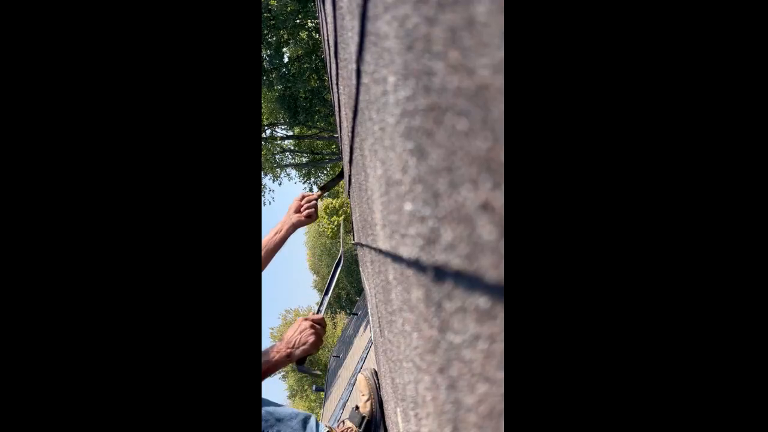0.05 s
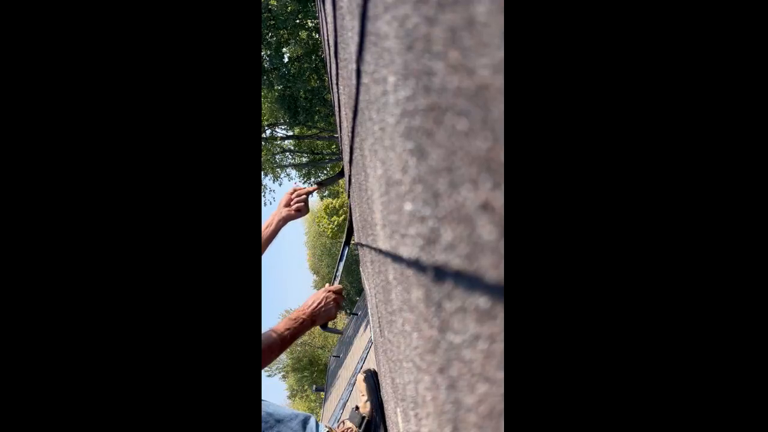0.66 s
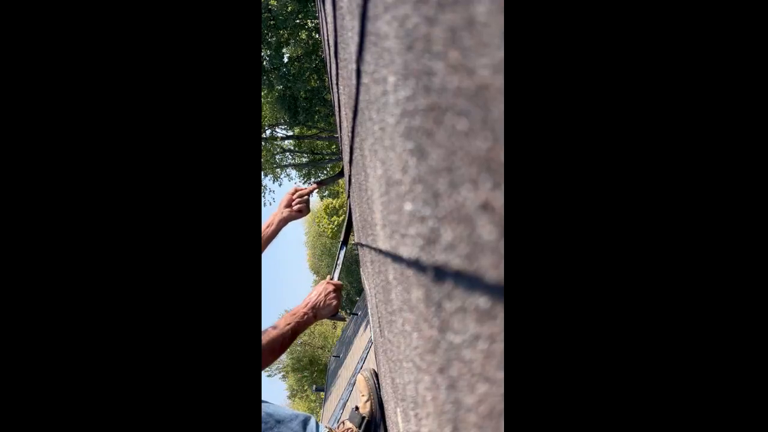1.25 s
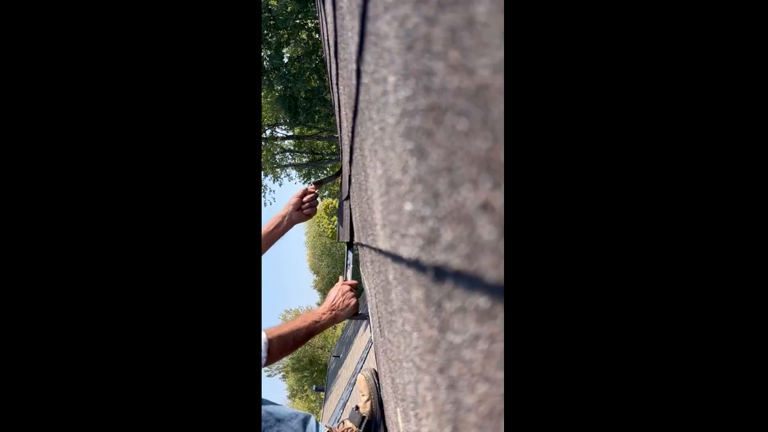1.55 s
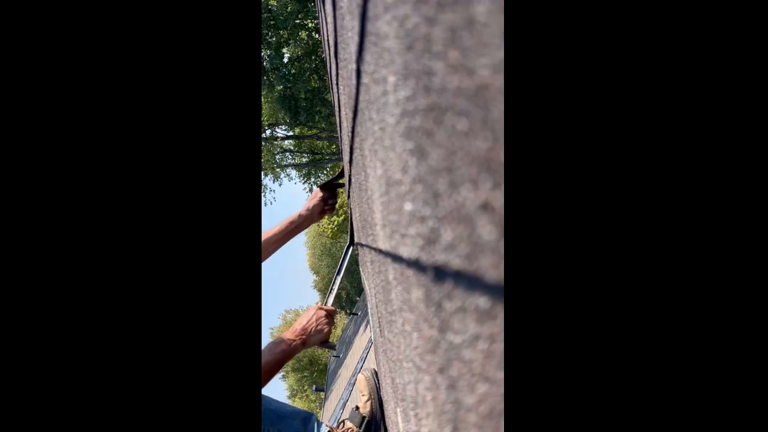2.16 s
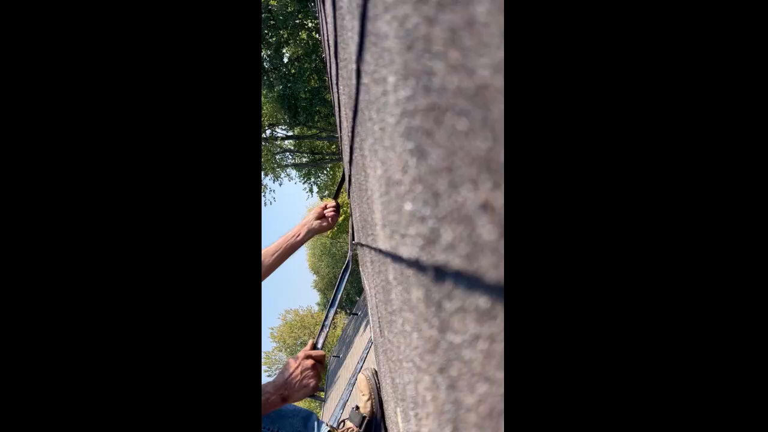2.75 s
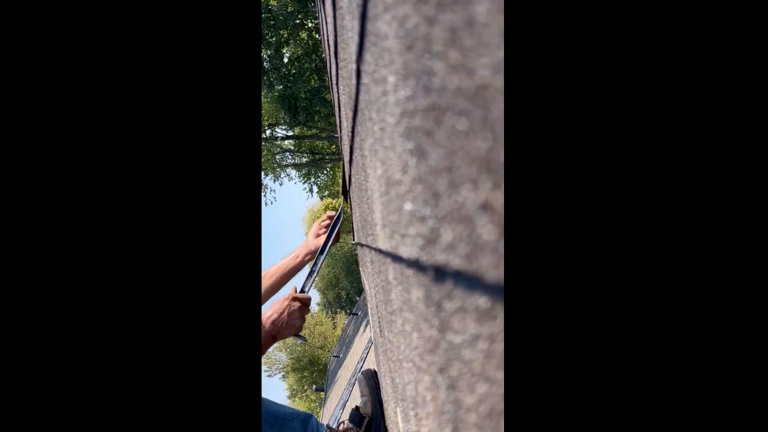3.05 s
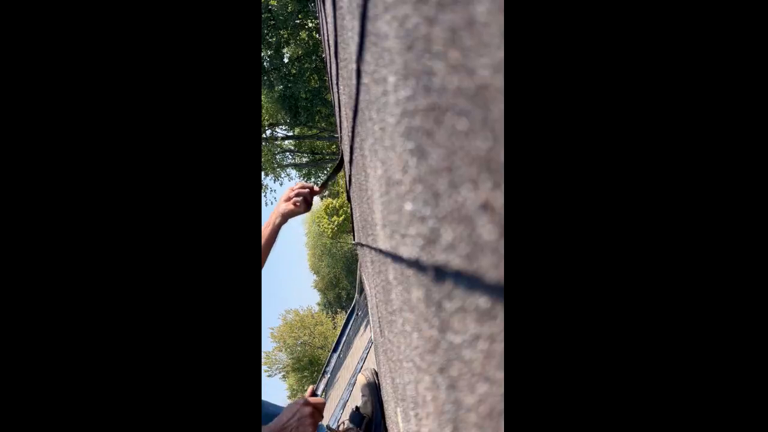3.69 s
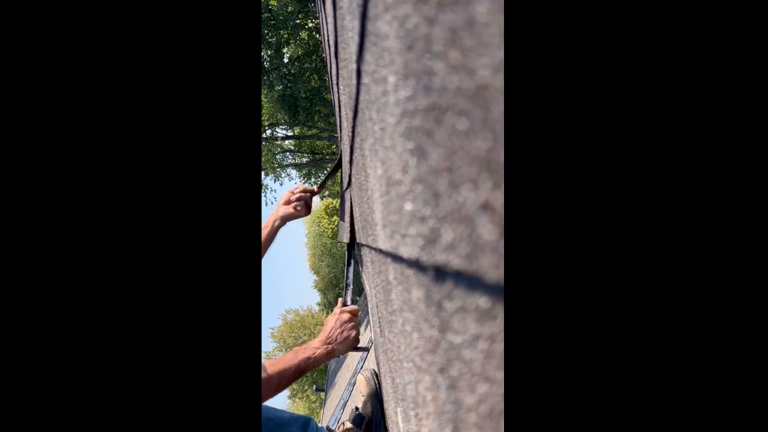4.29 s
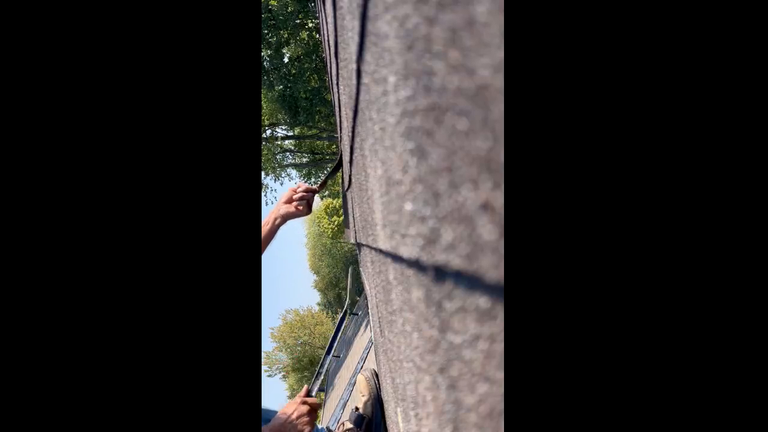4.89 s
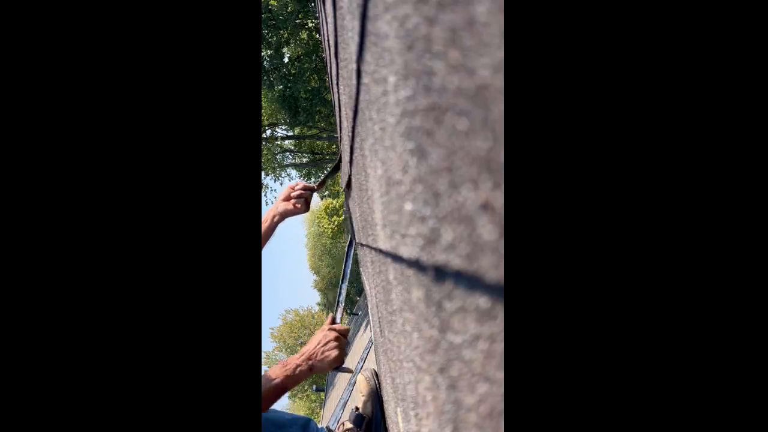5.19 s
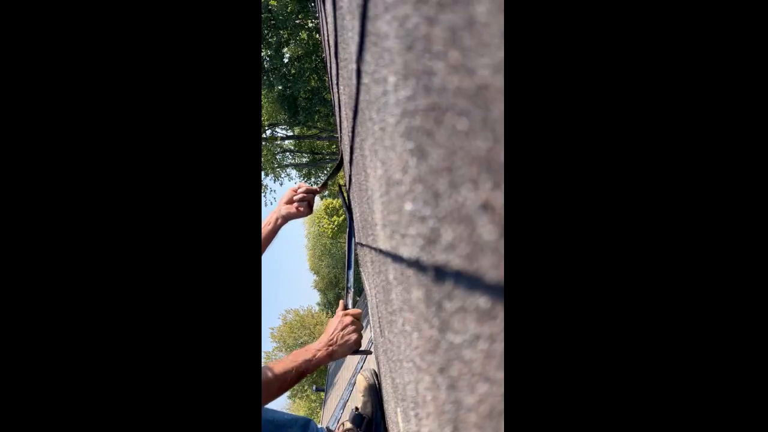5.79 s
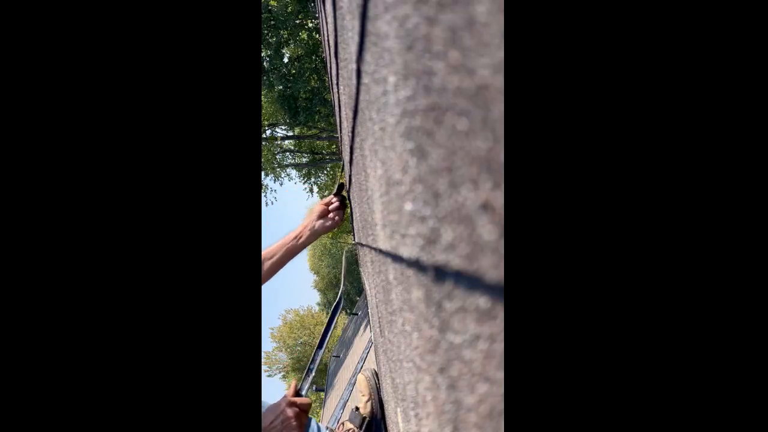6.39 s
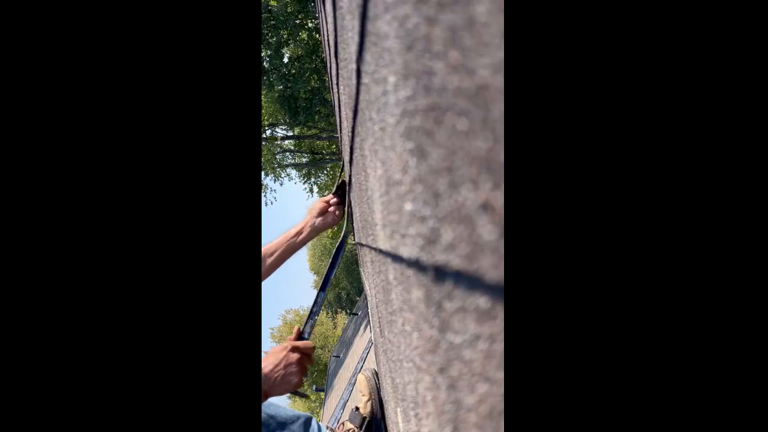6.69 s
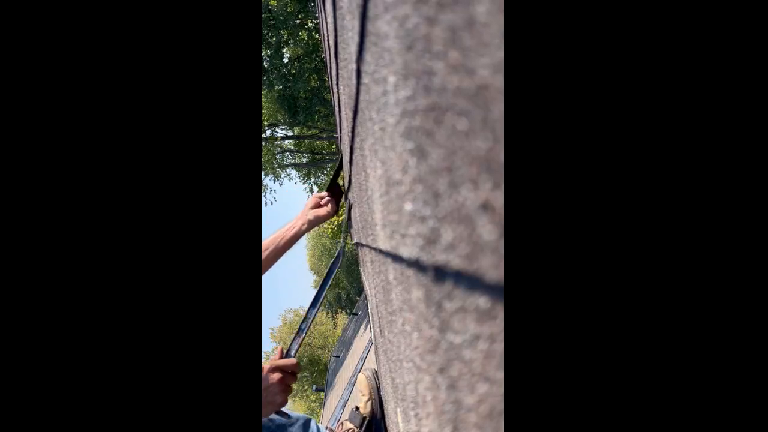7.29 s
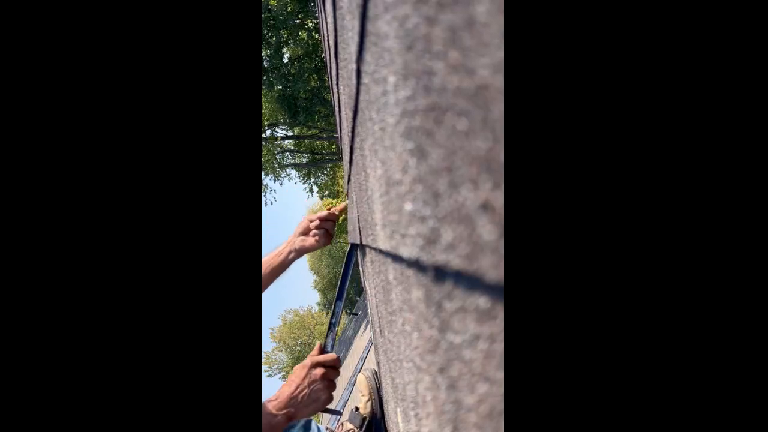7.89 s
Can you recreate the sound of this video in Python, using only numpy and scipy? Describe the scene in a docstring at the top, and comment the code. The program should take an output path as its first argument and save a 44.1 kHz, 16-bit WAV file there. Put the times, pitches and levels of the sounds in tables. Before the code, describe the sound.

Close, uneven scraping and snapping as roof shingles are pried loose with a metal bar, over faint wind and a distant vehicle.

```python
"""On a roof, close to a microphone lying there, a steel pry bar is worked under asphalt shingles.
Friction fractures the grit and faintly excites the modes of the bar; tar seams crack and tear.
The wooden deck carries each blow as a bending wave (a thump) and creaks by stick-slip under the lever.
Light wind rumbles, and the tyres and engine of a vehicle pass far off."""
import sys
import numpy as np
from scipy import signal
from scipy.fft import rfft, irfft
from scipy.io import wavfile

SR = 44100
rng = np.random.default_rng(int(sys.argv[2]) if len(sys.argv) > 2 else 0)


def transcribe(u):
    """Save the signal u as a 16-bit wav file named by the first command-line argument.

    u: samples, shape (n,) or (channels, n), limited to [-1, 1]; the rate is SR.
    q: integer samples, one column per channel.
    """
    v = np.clip(np.atleast_2d(u).T, -1, 1)
    q = np.round(v * 32767).astype(np.int16)
    wavfile.write(sys.argv[1], SR, q)


N = 355005
TIME, FREQS = np.arange(N) / SR, np.fft.rfftfreq(N, 1 / SR)

# Table levels are relative; "pressure" sets the lower, rougher part of a sound against its bright part.
# a seam gives way, the deck springs back: (time [s], snap [dB], pressure [dB], thump [dB], pitch [Hz])
RELEASES = [(0.237, -21.5, -2.5, -19, 145), (1.107, -19.5, 0, -11, 132), (1.373, -21.5, -1, -19.5, 145),
            (3.571, -27.5, -0.5, -27, 157), (3.871, -20, -6, -18.5, 186), (4.489, -18, -3, -14, 188),
            (5.186, -5.5, -3.5, -4.5, 181), (5.715, -17.5, 1, -15, 96), (7.446, -34, -1, -24, 134)]
# modes of the steel bar: (frequency [Hz], level [dB], t60 [s])
BAR_MODES = [(2035, -2, .06), (2680, -7, .04), (3042, 1, .15), (3553, -7, .06), (4075, -2, .065),
             (4673, -1.5, .11), (5243, -4, .07), (6000, -9, .06), (6700, -13, .1), (7120, -11, .1),
             (7325, -6.5, .08), (7900, -9, .1), (8177, -11, .08), (9000, -13, .04), (9700, -7.5, .06),
             (10780, -9.5, .06), (11680, -11, .07), (12500, -14, .05), (13430, -15, .05), (14000, -14, .04)]


def amp(db):
    """Amplitude ratio for a level in decibels."""
    return np.exp(np.asarray(db) * (np.log(10) / 20))


def unit(x):
    """Normalisation to an rms of one."""
    return x / np.sqrt(np.mean(x ** 2) + 1e-20)


def read(points, hz):
    """Interpolation on a log-frequency axis."""
    f, value = np.transpose(points)
    return np.interp(np.log(hz + 1), np.log(f + 1), value)


def curve(points):
    """Linear interpolation in time, sample by sample."""
    return np.interp(TIME, *np.transpose(points))


def add(mix, s, sound):
    """Superposition: a sound joins the mix at s seconds."""
    part = mix[max(round(s * SR), 0):][:len(sound)]
    part += sound[:len(part)]


def colour(x, spectrum, size=2048):
    """Minimum-phase filter of unit energy with the given spectral shape."""
    log_gain = np.log(amp(read(spectrum, abs(np.fft.fftfreq(size, 1 / SR)))))
    response = np.exp(np.conj(signal.hilbert(log_gain)))
    taps = np.fft.ifft(response).real[:size // 2]
    return signal.oaconvolve(x, taps / np.linalg.norm(taps))[:N]


def resonate(x, hz, width_hz):
    """Damped resonator of unit energy whose frequency follows the curve hz."""
    turn = np.exp(2j * np.pi * np.cumsum(hz) / SR)
    r = np.exp(-np.pi * width_hz / SR)
    return (turn * signal.lfilter([np.sqrt(2 * (1 - r * r))], [1, -r], x / turn)).real


def wander(rate, size=8192):
    """Low-pass noise of unit rms that changes about rate times a second."""
    f = np.fft.rfftfreq(size, N / SR / size)
    slow = unit(irfft(rfft(rng.standard_normal(size)) * np.exp(-(f / rate) ** 2)))
    return np.interp(TIME, np.linspace(0, N / SR, size), slow)


def swell(s, half_width_s, db):
    """Gaussian envelope around one moment."""
    return amp(db) * np.exp(-np.minimum(((TIME - s) / half_width_s) ** 2, 20))


def contact(attack_s, hold_s, release_s):
    """Envelope with a linear attack and, after hold_s, exponential decay."""
    t = TIME[:SR]
    return np.minimum(t / attack_s, 1) * np.exp(-np.clip((t - hold_s) / release_s, 0, 20))


def stereo_noise(spectrum, apart=0.25):
    """Partial coherence: both microphone ports share one noise and differ by a weaker one."""
    shared, side = [colour(noise, spectrum) for noise in rng.standard_normal((2, N))]
    return shared + apart * np.outer([1, -1], side) / np.sqrt(2)


def wind(calm_db=-45, hiss_db=-66):
    """Amplitude-modulated noise: gusts swell an uneven low rumble over a faint, steady hiss."""
    # gusts: (time [s], half width [s], level [dB])
    gusts = [(1.5, 0.78, -58), (4.25, 0.52, -36.5), (5.55, 0.34, -42), (6.85, 0.41, -39),
             (7.699, 0.24, -41.5)]
    # spectra of the rumble and the hiss: (frequency [Hz], level [dB])
    rumble_spectrum = [(20, -41), (40, -8.5), (60, 7.5), (110, 1.5), (170, -1.5), (260, -11), (400, -23),
                       (1000, -57), (4000, -56)]
    hiss_spectrum = [(100, -68), (2000, -6), (4000, -7.5), (7000, -12), (9000, -16), (15000, -35)]
    strength = amp(calm_db) + sum(swell(*gust) for gust in gusts)
    buffeting = unit(amp(3 * wander(16)))
    rumble = stereo_noise(rumble_spectrum) * strength * buffeting
    return rumble + amp(hiss_db) * stereo_noise(hiss_spectrum)


def vehicle(nearest_s=3.99, pass_width_s=1.2, tyre_db=-44.5):
    """Spherical spreading: tyre noise falls as 1 / distance; the engine sounds firing-rate harmonics."""
    # tyre noise: (frequency [Hz], level [dB])
    tyre_spectrum = [(40, -28), (200, 3.5), (400, 1), (700, -4.5), (1200, -10), (2000, -14.5), (3000, -20),
                     (5000, -48), (15000, -98)]
    # the engine revs up and eases off: (time [s], firing rate [Hz])
    firing = [(2.4, 80), (3.1, 83), (3.9, 96), (4.4, 99), (5, 94), (5.7, 96), (6.2, 83), (6.7, 80)]
    distance = np.hypot(1, (TIME - nearest_s) / pass_width_s)  # one at the nearest point
    tyres = stereo_noise(tyre_spectrum) * amp(tyre_db) / distance
    phase = 2 * np.pi * np.cumsum(curve(firing) * (1 + 0.0031 * wander(13))) / SR
    whine = swell(4.7, half_width_s=0.38, db=-49.5) * np.sin(4 * phase)
    exhaust = swell(6.01, half_width_s=0.48, db=-42.5) * np.sin(phase)
    return tyres + np.sqrt(2) * (whine + exhaust) * amp(2 * wander(35))


def cracks(gain_db=2, rise_s=0.0006, abruptness=1.35):
    """Brittle fracture: noise bursts, shorter when harder; returned plain and weighted by pressure."""
    # small cracks of tar and catches of the blade: (time [s], level [dB], pressure [dB])
    small_cracks = [(.459, -40, -4), (.8127, -41.5, 0.5), (1.176, -44.5, 1.5), (1.314, -31.5, -3.5),
                    (1.337, -23, 3), (2.54, -41.5, 2.5), (2.6, -20, -5), (2.8755, -31, -11),
                    (3.22, -46.5, 2), (4.249, -40, -4), (4.275, -44, -9), (4.334, -53, 13.5),
                    (4.373, -35, -4), (4.469, -27, 2), (4.713, -36, -2), (5.1754, -8.5, -3),
                    (5.232, -38.5, -5), (5.468, -51.5, 5), (5.664, -40.5, 0.5), (5.685, -44.5, 13),
                    (6.584, -35.5, -14), (6.717, -30.5, -7), (6.833, -29.5, -5.5), (7.108, -44.5, -4),
                    (7.394, -37.5, -4.5), (7.442, -33.5, -1.5), (7.737, -29.5, -3), (7.752, -33.5, -3),
                    (7.791, -44, -3), (7.803, -28.5, -2), (7.838, -39, -1)]
    reference_s, reference_db, halving_db = 0.0044, -20.5, 18
    snaps, heavy_snaps = np.zeros((2, N))
    t = TIME[:SR // 16]
    for s, db, pressure_db, *_ in [*small_cracks, *RELEASES]:
        decay_s = reference_s * 2 ** ((reference_db - db) / halving_db)
        envelope = np.exp(-(t / decay_s) ** abruptness) * (1 - np.exp(-t / rise_s))
        burst = amp(db + gain_db) * rng.standard_normal(len(t)) * envelope
        add(snaps, s, burst)
        add(heavy_snaps, s, burst * amp(pressure_db))
    return snaps, heavy_snaps


def clinks(reach_octaves=0.56):
    """Free vibration: a tap excites the bar's modes around one frequency, and each dies away."""
    # taps on the free bar: (time [s], level [dB], centre frequency [Hz])
    taps = [(0.237, -46, 6950), (0.322, -38, 5160), (2.795, -51, 3260), (3.349, -41, 3840),
            (3.573, -36.5, 3970), (7.352, -38, 3220), (7.397, -40.5, 3200), (7.447, -37.5, 4800)]
    out, t = np.zeros(N), TIME[:SR // 6]
    for hz, db, t60 in BAR_MODES:
        mode = np.sin(2 * np.pi * hz * t) * amp(-60 * t / t60)
        for s, tap_db, tap_hz in taps:
            coupling = np.exp(-(np.log2(hz / tap_hz) / reach_octaves) ** 2)
            add(out, s, mode * amp(tap_db + db / 2) * coupling)
    return out


def bending_wave(hz, q=2.5, octaves=1.13, lag=0.0773, size=8192):
    """Dispersion: high notes cross the damped boards first, so a blow sweeps down, then rings briefly."""
    f = np.fft.rfftfreq(size, 1 / SR)
    ratio = (f + 1) / hz
    band = np.exp(-(np.log2(ratio) / octaves) ** 2 / 2)
    resonance = 1 / (1 + 1j * q * (ratio - 1 / ratio))
    dispersion = np.exp(-4j * np.pi * lag * np.sqrt(f))  # group delay = lag / sqrt(f)
    wave = irfft(band * resonance * dispersion)[:size // 2]
    return wave / abs(wave).max()


def thumps(spring_s=0.0016):
    """Impulse response of the deck: it is struck by the lever, or springs back just after a release."""
    # the lever bumps or bears down on the deck: (time [s], peak [dB], pitch [Hz])
    blows = [(.53, -30, 134), (.698, -30, 101), (1.505, -22, 80), (1.589, -26.5, 113), (1.843, -35, 144),
             (1.967, -18, 238), (2.972, -32, 98), (3.644, -25, 161), (3.772, -19.5, 176),
             (3.896, -16.5, 202), (4.169, -21.5, 470), (4.305, -24, 162), (4.482, -14.5, 242),
             (4.5, -10.5, 131), (4.82, -23, 159), (5.185, -9, 426), (5.466, -25.5, 252), (5.687, -14, 186),
             (6.412, -30, 94), (6.585, -28.5, 102), (6.751, -26.5, 115), (6.918, -29, 103),
             (7.365, -36, 99), (7.68, -29, 124), (7.73, -26.5, 130)]
    rebounds = [(s + spring_s, db, hz) for s, _, _, db, hz in RELEASES]
    out = np.zeros(N)
    for s, db, hz in [*blows, *rebounds]:
        add(out, s, amp(db) * bending_wave(hz))
    return out


def strokes(resting_db=-70, shove_swell_db=15.5, crumbs_db=-39.5, attack_s=0.0062, bite_s=0.011):
    """Envelopes of sliding friction and its rasp: drags hold, shoves swell, jabs and crumbs die away."""
    # the blade slides evenly: (time [s], length [s], level [dB], pressure [dB])
    drags = [(0.314, 0.23, -42.5, -6), (0.544, 0.13, -63, 2), (0.723, 0.19, -47.5, 2),
             (1.608, 0.39, -59, 4), (1.974, 0.021, -45.5, 5.5), (2.5, 0.18, -49, -0.5),
             (2.823, 0.12, -53.5, -2), (2.933, 0.17, -47.5, 4.5), (3.567, 0.04, -40.5, -1.5),
             (6.579, 0.29, -48, -0.5), (7.122, 0.096, -45, 2), (7.561, 0.23, -50, -1)]
    # it is forced in ever harder, then stops: (time [s], length [s], final level [dB], pressure [dB])
    shoves = [(1.015, 0.087, -33.5, 2.5), (2.097, 0.34, -51, 4.5), (3.256, 0.11, -42, 3),
              (3.679, 0.2, -37, -1), (3.805, 0.078, -33, 6.5), (4.165, 0.086, -41, 2),
              (4.6, 0.1, -52.5, -7), (5.379, 0.066, -52.5, 0), (5.944, 0.17, -55.5, 0.5),
              (7.563, 0.3, -48, 3.5)]
    # the tip bites and skids off: (time [s], level [dB], pressure [dB])
    jabs = [(2.787, -31.5, -6.5), (4.477, -27, 8.5), (5.172, -47, 24), (5.708, -38.5, 11.5),
            (5.847, -42, -1), (7.345, -37, -7)]
    moves = [(s, db, pressure_db, contact(attack_s, length, release_s=0.022))
             for s, length, db, pressure_db in drags]
    for s, length, db, pressure_db in shoves:
        effort = amp(-shove_swell_db * np.maximum(1 - TIME[:SR] / length, 0))
        moves.append((s, db, pressure_db, effort * contact(attack_s, length, release_s=0.01)))
    for s, db, pressure_db in jabs:
        moves.append((s, db, pressure_db, contact(bite_s, bite_s, release_s=0.014)))
    for s, db, pressure_db, *_ in RELEASES:  # loose grit follows each release
        moves.append((s, db + crumbs_db, pressure_db, contact(bite_s, bite_s, release_s=0.033)))
    level, rasp_level = np.full((2, N), amp(resting_db))
    for s, db, pressure_db, shape in moves:
        add(level, s, amp(db) * shape)
        add(rasp_level, s, amp(db + pressure_db) * shape)
    return level, rasp_level


def granules(per_s=10000, rub=0.66, spread_db=3.9, clump_db=2.4):
    """Shot noise: tiny fractures of uneven size come in mild clumps, over a fine rub."""
    ticks = rng.standard_normal(N) * (rng.random(N) < per_s / SR)
    ticks *= amp(spread_db * np.minimum(rng.exponential(1, N), 3))
    friction = unit(ticks) + rub * rng.standard_normal(N)
    return unit(friction * amp(clump_db * wander(110)))


def catches(level, per_s=60, gain_db=3, low_hz=1100, high_hz=5000, decay_s=0.0027):
    """Damped oscillations: coarse grains catch on the edge and let go, each ringing at its own pitch."""
    out, t = np.zeros(N), TIME[:SR // 40]
    for s, (late, pitch) in zip(np.arange(0, N / SR, 1 / per_s), rng.random((1500, 2))):
        hz = low_hz * (high_hz / low_hz) ** pitch
        add(out, s + late / per_s, np.sin(2 * np.pi * hz * t) * np.exp(-t / decay_s))
    return out * amp(gain_db) * level


def bar_ring(slide, level, ring_db=-6.5, shift_db=5, slip_limit=0.015, grip=0.002):
    """Forced vibration: the scrape drives the bar's modes, which come and go as the contact moves."""
    drive = slip_limit * np.tanh(slide / slip_limit)  # hard strokes wedge the bar: it sings no louder
    drive *= level / (level + grip)  # a light touch hardly sets it ringing
    contacts = [drive * unit(amp(shift_db * np.clip(wander(9), -1, 1))) for _ in range(5)]
    out = np.zeros(N)
    for k, (hz, db, t60) in enumerate(BAR_MODES):
        r, w = amp(-60 / t60 / SR), 2 * np.pi * hz / SR
        gain = amp(db + ring_db) * np.sqrt(2 * (1 - r * r)) * np.sin(w)
        out += signal.lfilter([gain], [1, -2 * r * np.cos(w), r * r], contacts[k % len(contacts)])
    return out


def flap(drive, roam=0.15):
    """Variable resonance: the natural frequency of the lifted shingle roams as it is bent."""
    # resonance of the shingle: (time [s], frequency [Hz])
    resonance = [(.4, 1270), (.87, 1430), (1.08, 1810), (2.54, 1380), (2.6, 1860), (3, 1300), (3.12, 1290),
                 (3.8, 1160), (3.87, 1460), (4.7, 1160), (6.8, 1330), (7.15, 1190), (7.8, 1390)]
    return resonate(drive, curve(resonance) * np.exp(roam * wander(20)), width_hz=230)


def rips(start_hz=1440, end_hz=474, width_hz=900, swell_db=12):
    """Cascading fracture: a dense crunch builds, and its resonance drops as the shingle comes free."""
    # a tar seam tears right through: (time [s], length [s], level [dB])
    tears = [(1.083, 0.0243, -21.5), (1.962, 0.0304, -27.5), (3.836, 0.069, -20.5)]
    out = np.zeros(N)
    for s, length, db in tears:
        progress = np.linspace(0, 1, round(length * SR))
        hz = start_hz + (end_hz - start_hz) * progress ** 4
        fibres = rng.standard_normal(SR)[:len(hz)]
        crunch = unit(resonate(resonate(fibres, hz, width_hz), hz, width_hz))
        envelope = amp(db - swell_db * (1.5 - progress)) * signal.windows.tukey(len(hz), 0.15)
        add(out, s, crunch * envelope)
    return out


def shingles(friction_db=-0.64, flap_db=-8, rasp_db=-4):
    """Source and filter: friction and fracture sound bright in the grit and lower under pressure."""
    # spectra of bright grit, pressed scraping and heavy snaps: (frequency [Hz], level [dB])
    grit_spectrum = [(300, -63), (1200, -16), (2200, 12.5), (3100, 17), (3700, 9.5), (5000, 7.5),
                     (6500, 0.5), (9000, -2), (11500, -11), (13500, -13), (15200, -16)]
    rasp_spectrum = [(100, -1), (300, 5.5), (550, 7), (850, 4.5), (1300, 7.5), (1800, -2), (2250, 5.5),
                     (2700, 2.5), (5000, -8.5), (12000, -51.5)]
    tear_spectrum = [(100, -0.5), (300, 3.5), (550, 2.5), (760, 3.5), (1300, 3.5), (1650, -2), (2050, 2),
                     (2700, 4), (5000, -6.5), (12000, -52.5)]
    level, rasp_level = strokes()
    friction = granules() * amp(friction_db)
    slide, pressed = friction * level, friction * rasp_level
    snaps, heavy_snaps = cracks()
    grit = colour(slide + snaps, grit_spectrum)
    rasp = amp(rasp_db) * colour(pressed, rasp_spectrum)
    tearing = colour(heavy_snaps, tear_spectrum)
    lifted = amp(flap_db) * flap(pressed + heavy_snaps)
    return grit + rasp + tearing + lifted + rips() + catches(level) + bar_ring(slide, level)


def creaks(jitter=0.287, size_spread_db=1.5, pitch_spread=0.24):
    """Stick-slip: the lever sends uneven runs of small thumps into the deck; hard slips ring the board."""
    # runs of slips: (time [s], length [s], level [dB], slip rate [Hz], pitch [Hz])
    runs = [(1.41, 0.13, -38, 94, 115), (1.839, 0.13, -33, 103, 138), (1.985, 0.078, -33, 73, 109),
            (2.52, 0.072, -31, 103, 136), (2.611, 0.039, -27.5, 120, 190), (3.304, 0.104, -33, 100, 135),
            (3.793, 0.094, -33, 79, 99), (4.176, 0.033, -20, 165, 197)]
    # modes of the board under the heel of the bar: (frequency [Hz], level [dB], t60 [s])
    board_modes = [(553, 0, 0.018), (1240, -12, 0.0066), (2190, -18, 0.019)]
    hard_db, hardening, knock_lag_s = -19.5, 1.9, 0.004
    out, t = np.zeros(N), TIME[:SR // 20]
    knock = sum(amp(db - 60 * t / t60) * np.sin(2 * np.pi * hz * t) for hz, db, t60 in board_modes)
    for start, length, db, rate, hz in runs:
        run = np.zeros(SR // 2)
        for s, (late, size, tune) in zip(np.arange(0, length, 1 / rate), rng.standard_normal((20, 3))):
            s += jitter * late / rate
            add(run, s, amp(size_spread_db * size) * bending_wave(hz * np.exp(pitch_spread * tune)))
            add(run, s + knock_lag_s, amp(hardening * (db - hard_db)) * knock)
        rms = np.sqrt(np.sum(run ** 2) / (length * SR))
        add(out, start, amp(db) * run / rms)
    return out


def reflections(x, near_t60=0.02, near_db=-19, far_t60=0.33, far_db=-32):
    """Scattering: quick echoes from roof and worker, a faint tail from trees; each port gets its own."""
    t = TIME[:SR // 3]
    response = np.zeros((2, len(t)))
    for t60, db in (near_t60, near_db), (far_t60, far_db):
        tail = rng.standard_normal(response.shape) * amp(-60 * t / t60)
        response += amp(db) * tail / np.linalg.norm(tail[0])
    return signal.fftconvolve(x[None], response, axes=1)[:, :N]


def scene():
    """Superposition of the work on the roof, its reflections, the wind and the far vehicle."""
    blade = shingles() + clinks()
    work = blade + thumps() + creaks()
    # grit breaks at many spots along the blade, so the sound flickers slightly between the ports
    flicker = amp(-15) * np.outer([1, -1], blade * wander(300))
    return work + flicker + reflections(work) + wind() + vehicle()


def record(dry, cutoff_hz=15250):
    """Phase and level differences between the two microphone ports, then a low-pass band limit."""
    # phase lead of the left port: (frequency [Hz], phase [rad])
    port_phase = [(20, 0), (130, -.3), (700, -.65), (1500, -.3), (2000, .7), (2600, 2.2), (3700, .9),
                  (5000, 1.3), (5700, 3), (6300, 3.4), (7600, 6.1), (8500, 6.6), (9800, 9.2), (11000, 9.7),
                  (11800, 12.3), (13200, 12.8), (14300, 15.6)]
    # left port minus right: (frequency [Hz], level [dB])
    port_balance = [(100, -.5), (700, -2.2), (1400, -1.5), (2000, .3), (8000, 0)]
    left = np.exp(0.5j * read(port_phase, FREQS)) * amp(read(port_balance, FREQS) / 2)
    stereo = irfft(rfft(dry) * np.array([left, 1 / left]), N)
    lowpass = signal.firwin(301, cutoff_hz, window=("kaiser", 9), fs=SR)
    return signal.oaconvolve(stereo, lowpass[None], "same")


dry = scene()
out = record(dry)
transcribe(out)
```